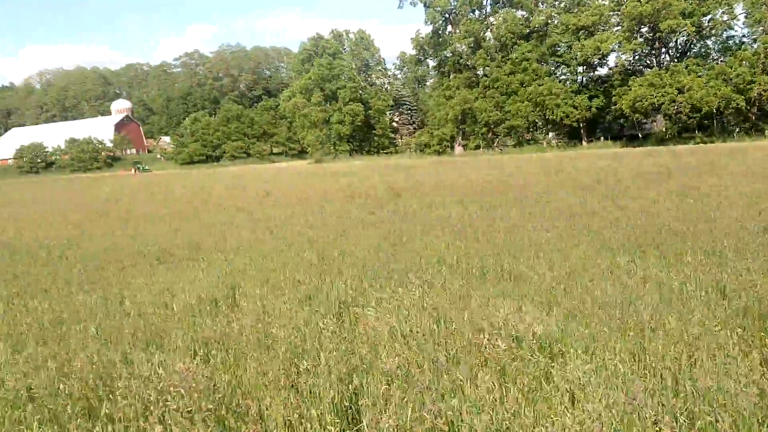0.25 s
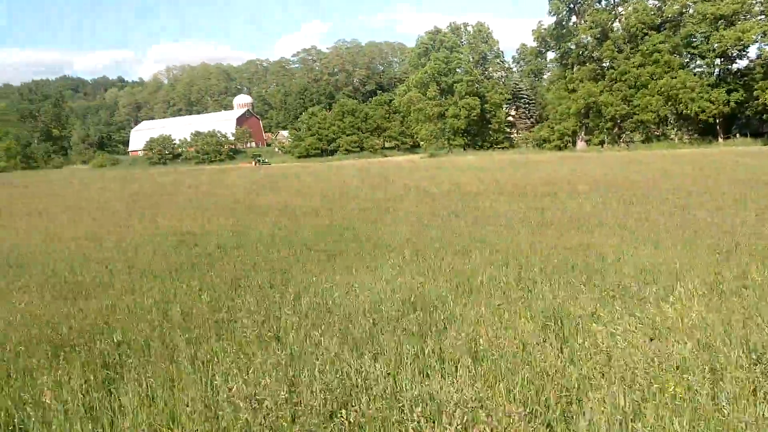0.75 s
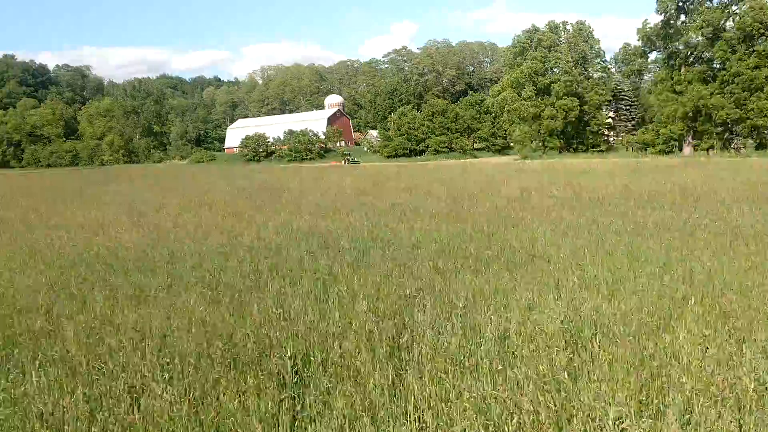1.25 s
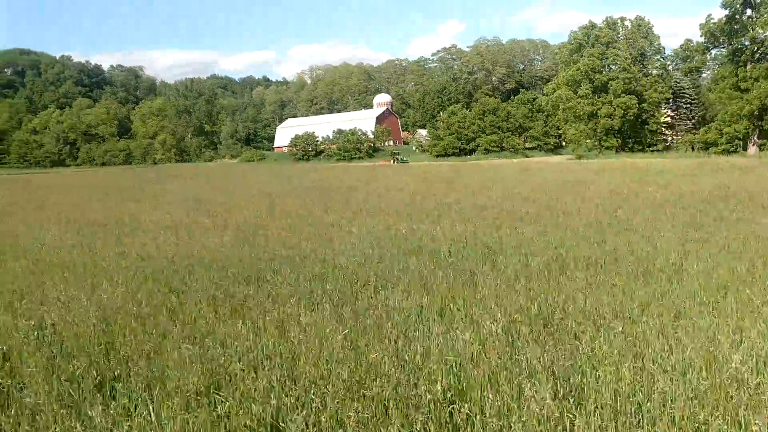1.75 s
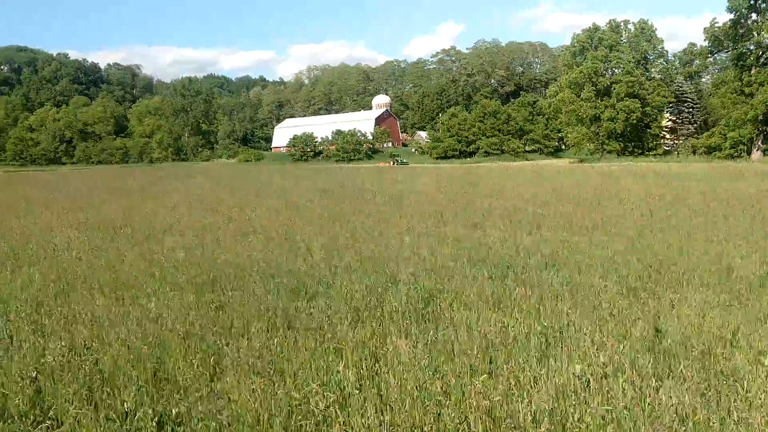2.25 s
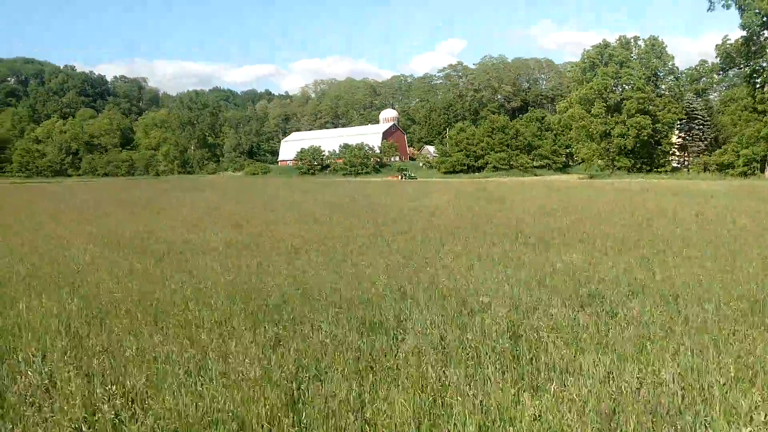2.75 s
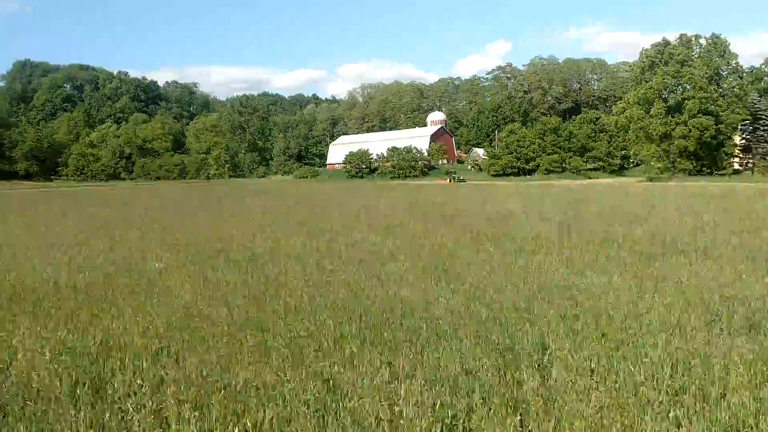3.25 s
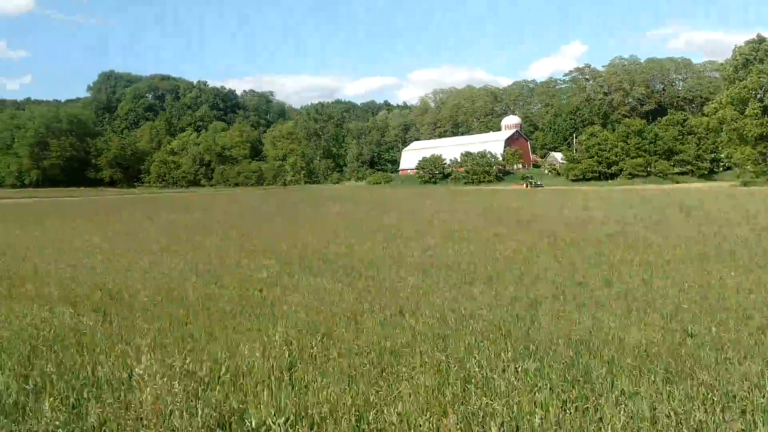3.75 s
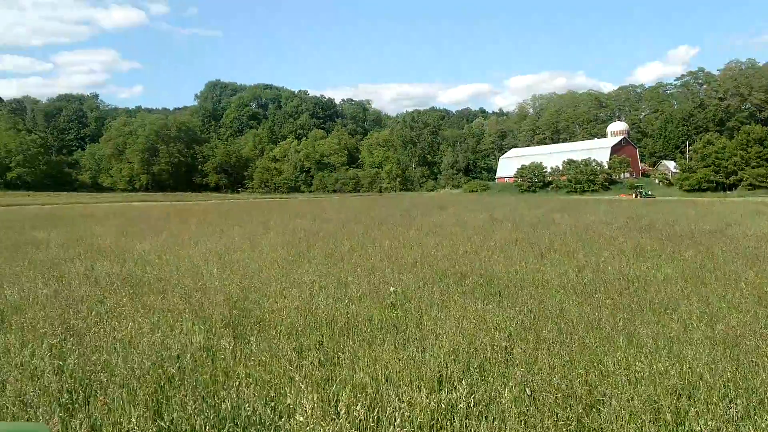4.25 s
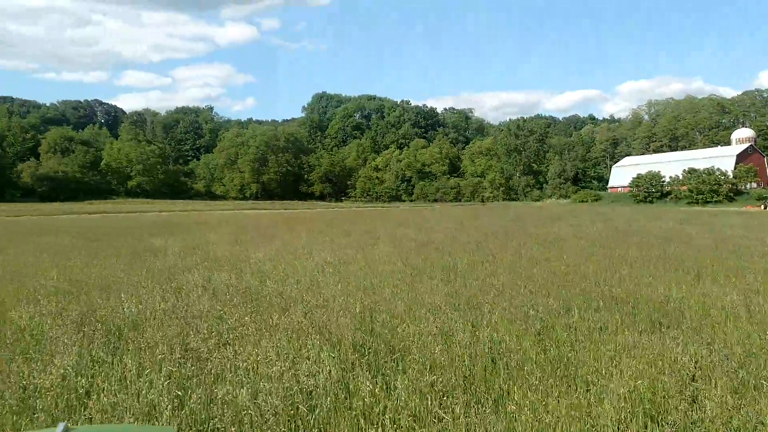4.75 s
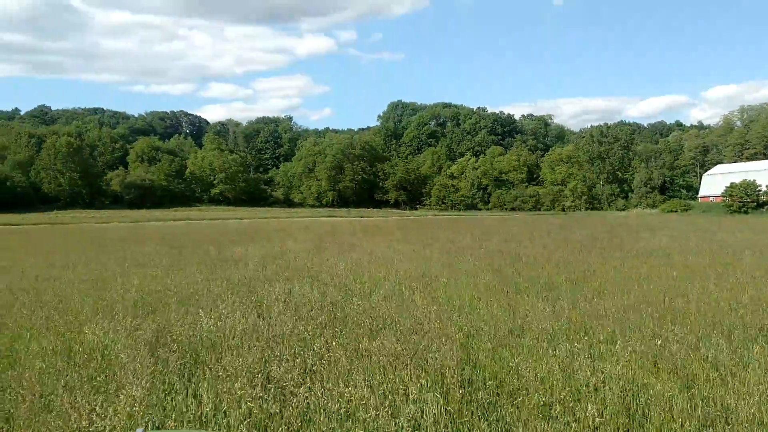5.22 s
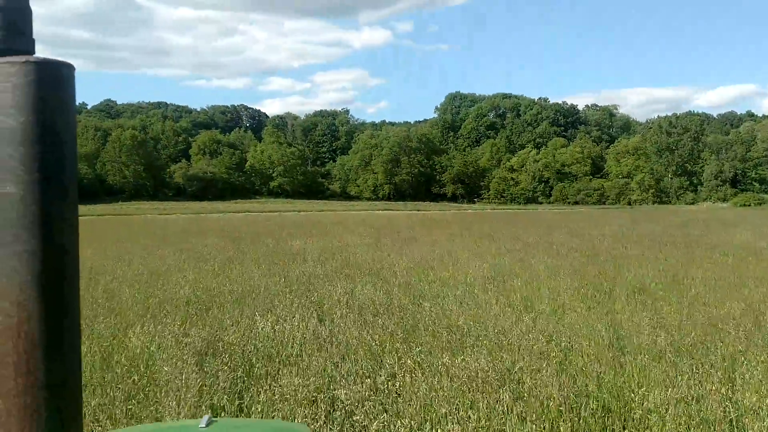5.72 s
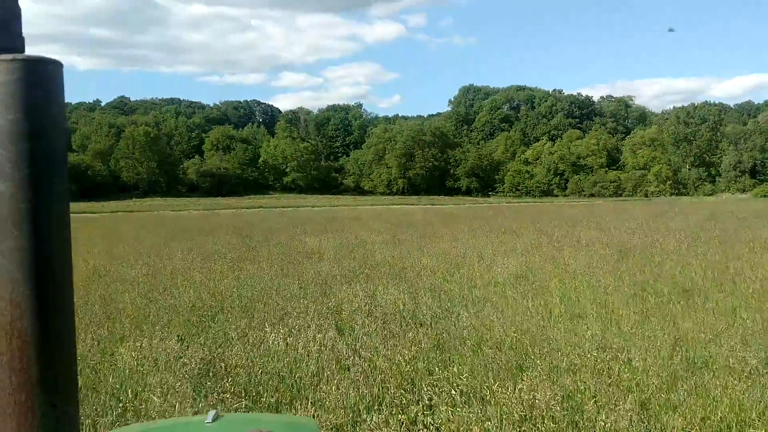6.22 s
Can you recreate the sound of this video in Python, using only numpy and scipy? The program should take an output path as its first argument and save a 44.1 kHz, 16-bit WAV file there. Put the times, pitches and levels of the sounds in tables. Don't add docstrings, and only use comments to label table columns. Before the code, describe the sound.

A tractor engine drones at steady high revs while mower gears whine in quick throbs over a broad rushing roar, with small wind puffs.

```python
import sys
import numpy as np
from scipy import signal
from scipy.fft import rfft, irfft
from scipy.io import wavfile
from scipy.ndimage import uniform_filter1d

SR = 44100
rng = np.random.default_rng(int(sys.argv[2]) if len(sys.argv) > 2 else 0)


def bounce(signal):
    frames = np.transpose(np.atleast_2d(signal))
    limited = np.clip(frames, -1, 1)
    pcm = np.round(limited * 32767).astype(np.int16)
    wavfile.write(sys.argv[1], SR, pcm)


def level_to_linear(level):
    exponent = np.asarray(level, float) / 20
    return 10 ** exponent


N = 285768

T = np.arange(N) / SR
HZ = np.arange(N // 2 + 1) * SR / N
PORTS = np.array([[.5], [-.5]])


def about_mean(db):
    return db - 10 * np.log10(np.mean(level_to_linear(db) ** 2))


def walk(rate_hz):
    hold = int(SR / rate_hz)
    held = np.repeat(rng.standard_normal(N // 50), hold)[:N]
    return 1.3 * uniform_filter1d(uniform_filter1d(held, hold), hold)


def throbs(rows, idle=1.):
    swells = sum(level_to_linear(db) * np.exp(-2 * ((T - s) / length_s) ** 2) for s, db, length_s in rows)
    return about_mean(20 * np.log10(idle + swells))


def whine(tones, swing_db, flicker_db=1.0, slip_rad=0, bend_rad_per_db=0):
    out = np.zeros((2, N))
    for hz, wander_hz, db, tilt_db, lead_rad, likeness in tones:
        pitch_hz = hz + wander_hz * walk(25)
        phase = 2 * np.pi * np.cumsum(pitch_hz) / SR + bend_rad_per_db * swing_db
        grain_hz = 3 + 4 * wander_hz
        a = np.array([walk(grain_hz), walk(grain_hz)])
        b = np.array([walk(grain_hz), walk(grain_hz)])
        smear = (a * np.sin(phase) + b * np.cos(phase)) / np.sqrt(2)
        direct = np.sin(phase + (lead_rad + slip_rad) * PORTS)
        tone = np.sqrt(likeness) * direct + np.sqrt(1 - likeness) * smear
        gain_db = db + tilt_db * PORTS + swing_db + flicker_db * walk(20)
        out += np.sqrt(2) * level_to_linear(gain_db) * tone
    return out


def limiter():
    # time in seconds, duck depth in dB.
    ducks = [(.08, 2.), (.34, 3.), (.57, 1.4), (.88, 3.2), (1.13, 2.), (1.55, 2.7), (1.72, 2.), (1.86, 1.8),
             (1.96, 1.2), (2.12, .8), (2.42, 3.6), (2.59, 1.3), (2.79, .8), (3.04, 2.8), (3.24, 1.7),
             (3.6, 3.1), (3.77, 2.2), (4.05, .5), (4.14, 1.3), (4.3, .9), (4.43, 1.2), (4.57, 2.8),
             (4.65, 1.1), (5.04, 3.2), (5.29, 2.3), (5.6, 3.1), (5.81, 1.6), (5.93, 1.2), (6.22, 3.1)]
    duck_s, recover_db_per_s = .03, 9.125
    ducked_db = sum(db * np.clip(.5 + (T - s) / duck_s, 0, 1) for s, db in ducks)
    return about_mean(recover_db_per_s * T - ducked_db)


def facing():
    # time in seconds, exhaust side of the roar in dB.
    exhaust_side = [
        (0, -24.5),
        (2.4, -23.6),
        (3.8, -23.6),
        (4.1, -22),
        (5.7, -22.2),
        (6.48, -23),
    ]
    return about_mean(np.interp(T, *np.transpose(exhaust_side)))


def wind():
    # time in seconds, level in dB, length in seconds, top frequency in Hz.
    puffs = [
        (.55, -29, .03, 120),
        (.82, -24, .04, 90),
        (1.3, -23, .025, 280),
        (1.9, -31, .02, 280),
        (2.7, -28, .04, 140),
        (5.5, -20.5, .025, 200),
        (5.63, -26, .04, 130),
        (5.97, -23, .02, 170),
    ]
    breeze_db, breeze_hz = -44, 70
    air = rfft(rng.standard_normal((2, N))) * HZ ** 2 / (HZ ** 2 + 40 ** 2)
    breeze = irfft(air / (1 + (HZ / breeze_hz) ** 2), N)
    out = level_to_linear(breeze_db + 4 * walk(7)) * breeze / breeze.std()
    for s, db, length_s, top_hz in puffs:
        puff = irfft(air[0] / (1 + (HZ / top_hz) ** 4), N)
        out[0] += level_to_linear(db) * puff / puff.std() * np.exp(-((T - s) / length_s) ** 2 / 2)
    return out


def roar(cycles, facing_db):
    # frequency in Hz, first port level in dB per Hz, second port level in dB per Hz.
    spectrum = [(40, -34, -19), (70, -9.5, -17), (101, 5, 1), (177, 6, 2), (297, -5, -4.5), (430, -4, -1),
                (635, -7.5, -2), (1050, -1.5, -15.5), (1740, -11, -5), (2270, -11, -10.5),
                (3390, -13, -17.5), (5150, -15.5, -19), (8470, -20.5, -26.5), (15800, -34, -31)]
    level_db, port_gap_s, throb = -50, .00037, .04
    hz, *port_db = np.transpose(spectrum)
    octaves = np.log2(HZ + 1)
    colour_db = np.array([np.interp(octaves, np.log2(hz), db, left=-40) for db in port_db])
    colour = level_to_linear(colour_db + level_db) * np.sqrt(SR / 2)
    alike = .95 * np.exp(-(2 * np.pi * HZ * port_gap_s) ** 2 / 6)
    mid, side = rfft(rng.standard_normal((2, N)))
    noise = colour * (np.sqrt((1 + alike) / 2) * mid + 2 * PORTS * np.sqrt((1 - alike) / 2) * side)

    out, swell, swish = np.zeros((2, N)), walk(9), walk(30)
    for centre in np.arange(5, 14.6, .5):
        band = np.cos(np.pi * np.clip(octaves - centre, -.5, .5)) ** 2
        turn_db = facing_db * (1 - PORTS) * np.exp(-((centre - np.log2(570)) / .6) ** 2)
        flicker_db = .15 * swell + .5 * (centre > 11.2) * swish + .6 * walk(14)
        out += irfft(noise * band, N) * level_to_linear(turn_db + flicker_db)

    turns = 2 * np.pi * cycles
    lift = np.cos(6 * turns) + 1.4 * np.cos(3 * turns) + .35 * np.cos(turns)
    return out * (1 + throb * lift)


def steady_tones():
    # frequency in Hz, wander in Hz,
    # level in dB, first minus second port in dB, first port lead in rad, likeness of the ports 0-1.
    smeared_tones = [(1462, 10, -37, 0, -2.6, .6), (1561, 5, -43, 4, 3, .6), (2533, 7, -42.5, 1, .5, .6),
                     (2160, 7, -47, 0, .2, .5), (11100, 150, -51, 0, 0, 0)]
    return whine(smeared_tones, 0)


def gears():
    # frequency in Hz, wander in Hz, level in dB, first minus second port in dB,
    # first port lead in rad, likeness of the ports 0-1.
    shaft_tones = [(377.5, 1, -31, -1, .1, .98), (401.7, 1, -35, 0, .1, .97), (629.8, 1.5, -42, 2, .4, .9)]
    timing_tones = [(1172, 2.5, -34, 0, 1.9, .96)]
    mesh_tones = [(943, 5, -32.5, 7, -1, .95), (1887, 8, -41, 4, -2.6, .5), (2837, 12, -46, 5, -2.9, .5)]
    # time in seconds, level of the swell added to the idle whine in dB, length in
    # seconds.
    mesh_throbs = [(.34, 9, .09), (.64, 9, .14), (.92, 8, .17), (1.21, 10, .1), (1.36, 5, .06),
                   (1.51, 13.5, .08), (1.65, 6, .1), (1.89, 10, .09), (2.15, 10, .07), (2.42, 9, .13),
                   (2.66, 11.5, .07), (2.96, 11.5, .12), (3.23, 11, .09), (3.5, 13, .12), (3.93, 11.5, .14),
                   (4.26, 9, .05), (4.38, 15, .1), (4.74, 10, .12), (5.06, 11, .1), (5.37, 14, .14),
                   (5.69, 12.5, .07), (5.9, 10, .06), (6.23, 11.5, .14), (6.41, 10, .06)]
    turn_s, turn_takes_s = 4.55, .056
    turned = .5 + .5 * np.tanh((T - turn_s) / turn_takes_s)
    shaft_db = about_mean(-7 * turned + 1.2 * (1 + turned) * walk(6))
    shaft = whine(shaft_tones, shaft_db)
    timing_db = about_mean(.1 * T + .4 * walk(8))
    timing = whine(timing_tones, timing_db, slip_rad=.6 - 1.7 * turned)
    mesh = whine(mesh_tones, throbs(mesh_throbs, idle=.25), bend_rad_per_db=.2)
    return shaft + timing + mesh


def pump(cycles):
    # frequency in Hz, wander in Hz, level in dB, first minus second port in dB,
    # first port lead in rad, likeness of the ports 0-1.
    pump_tones = [(1689, 4, -29.5, 4, 0, .92)]
    overtones = [(3385, 18, -37.5, 2, -2.5, .6), (4222, 20, -45, 4, -.2, .4), (5070, 20, -51, 5, -1.5, .1)]
    # time in seconds, level of the swell added to the idle whine in dB, length in
    # seconds.
    surges = [(.15, 3, 0.23), (.63, -1, .2), (1.1, 4, 0.11), (1.38, 11, 0.11), (1.62, 0, .15),
              (2.02, 3, 0.15), (2.29, 7, 0.25), (2.88, -2, 0.082), (3.58, -2, 0.15), (4.08, 0, 0.25),
              (4.53, 5, .1), (4.85, 9.5, 0.31), (5.55, 8.5, 0.17), (5.95, 12, 0.1), (6.14, 0, 0.05)]
    # time in seconds, level in dB,
    # first minus second port in dB, first port lead in rad.
    sound_path = [(0, 1.5, 6, 0.5), (.4, -7, 17.5, 4.5), (.8, 2, 10, 2), (1.1, -1, -4, 4),
                  (1.4, -4.3, 10, 7.5), (2.05, 0.5, 7, 4), (2.3, 1.5, 10.5, 5), (2.55, -8.5, 19.5, 10.5),
                  (3.2, -5.5, 19, 5), (3.6, 3, -12, 5), (4.0, -1, 4, 5), (4.2, 1, 3, 3.5),
                  (4.45, -10, 5, 4.2), (4.65, -2.5, -1, 7.5), (5.0, 2.5, 11, 8), (5.5, -5, 7, 7.5),
                  (6.15, 4.5, -7, 8.5), (6.48, -3.5, -8, 8.5)]
    s, *path = np.transpose(sound_path)
    db, tilt_db, slip_rad = (np.interp(T, s, p) for p in path)
    whine_db = db + (tilt_db - pump_tones[0][3]) * PORTS
    flutter_db = 4 * np.cos(2 * np.pi * cycles) - 1
    out = whine(pump_tones, whine_db, slip_rad=slip_rad)
    return out + whine(overtones, throbs(surges) + flutter_db)


def fan():
    # frequency in Hz, wander in Hz, level in dB, first minus second port in dB,
    # first port lead in rad, likeness of the ports 0-1.
    fan_tones = [(199.3, .4, -17, 2.7, .1, .997)]
    # time in seconds, extra lead at the first port in rad.
    fan_turn = [(0, .08), (1.1, .02), (2.8, .02), (3.6, -.04), (6.48, -.04)]
    beat_hz, beat_start_rad = 4.1, 1.9
    beat = 2 * np.pi * beat_hz * T + beat_start_rad
    beat_db = .9 - .7 * PORTS
    swing_db = beat_db * np.cos(beat) + .25 * walk(2.96)
    slip_rad = np.interp(T, *np.transpose(fan_turn)) + .07 * np.sin(beat)
    return whine(fan_tones, swing_db, flicker_db=.53, slip_rad=slip_rad)


def engine(cycles, facing_db):
    # multiple of the cycle, level in dB, first minus second port in dB, first port lead in rad.
    strong_tones = [(6.0, -30.0, 2.0, 0.1), (8.0, -33.0, 3.0, -0.1), (9.0, -27.0, 3.0, 0.0),
                    (10.0, -32.0, 4.0, 0.1), (14.0, -41.0, 5.0, 0.2), (15.0, -39.0, 1.0, 0.3),
                    (18.0, -42.0, 3.0, 0.4), (22.0, -44.0, 3.0, 0.1), (26.0, -41.0, 4.0, 0.0),
                    (28.0, -44.0, 8.0, -0.3), (30.0, -41.0, 2.0, 0.1), (31.0, -43.0, 3.0, 0.1),
                    (33.0, -39.0, 6.0, 0.0), (34.0, -42.0, 5.0, 0.8), (36.0, -40.0, 4.0, 0.8),
                    (40.0, -43.0, -1.0, 0.6), (42.0, -44.5, 3.0, 0.3), (43.0, -46.0, 3.0, 0.3),
                    (47.0, -41.0, 3.0, -0.1), (49.0, -45.0, 2.0, 0.2), (51.0, -41.0, 2.0, -0.2),
                    (52.0, -42.0, 4.0, -0.3), (54.0, -43.0, 4.0, 1.3), (57.0, -42.0, 1.0, 0.5),
                    (63.0, -44.0, 0.0, 0.2), (66.0, -42.0, -2.0, 0.2), (69.0, -43.5, -1.0, -0.2),
                    (78.0, -46.0, -4.0, -1.3), (81.0, -44.0, -4.0, 0.1), (83.0, -44.0, 4.0, 1.4)]
    # multiple of the cycle, dB per dB of facing.
    exhaust_tones = [(31, -2.5), (33, 4.5), (34, 2.5), (35, 2.5), (36, 2), (42, 4.5), (43, 3.5), (47, -2.5),
                     (51, 2.5), (54, 5), (63, -3), (69, -1.5), (78, -3)]
    faint_db, scatter_db, unsteady_db = -49, 2.5, 1.6
    strong = {round(row[0]): row[1:] for row in strong_tones}
    turning = dict(exhaust_tones)
    out = np.zeros((2, N))
    for k in range(4, 91):
        size, side = rng.standard_normal(2)
        start_rad = rng.uniform(0, 2 * np.pi)
        faint = (faint_db + scatter_db * size, 2.2, side * k / 80)
        db, tilt_db, lead_rad = strong.get(k, faint)
        gain = level_to_linear(db + turning.get(k, 0) * facing_db + unsteady_db * walk(5))
        tone = np.sin(2 * np.pi * k * cycles + start_rad + lead_rad * PORTS)
        out += np.sqrt(2) * gain * level_to_linear(tilt_db * PORTS) * tone
    return out


def scene():
    cycle_hz = 16.262
    cycles = np.cumsum(cycle_hz * (1 + .001 * walk(1.5))) / SR
    facing_db = facing()
    steady = roar(cycles, facing_db) + steady_tones() + fan() + engine(cycles, facing_db)
    pushing = wind() + gears() + pump(cycles)
    return steady + pushing / level_to_linear(.62 * limiter())


def low_pass(x):
    return signal.sosfilt(signal.butter(12, 16330, fs=SR, output="sos"), x)


def record(dry):
    cancel_gain, cancel_top_hz, cancel_delay_s, top_hz = .89, 7200, .000457, 15750
    ports = rfft(dry * level_to_linear(limiter()))
    dull = (HZ / cancel_top_hz) ** 2
    delay_s = cancel_delay_s * (1 + .033 * np.tanh((dull / .65) ** 3))
    late = cancel_gain * np.exp(-dull - 2j * np.pi * HZ * delay_s)
    band = (HZ < top_hz) * HZ ** 4 / (HZ ** 4 + 32. ** 4)
    mix = irfft(band * (ports - late * ports[::-1]), N)
    return low_pass(mix)


dry = scene()
out = record(dry)
bounce(out)
```